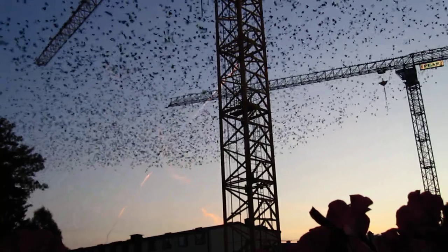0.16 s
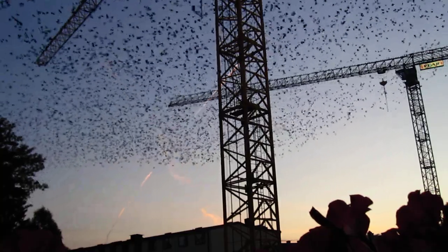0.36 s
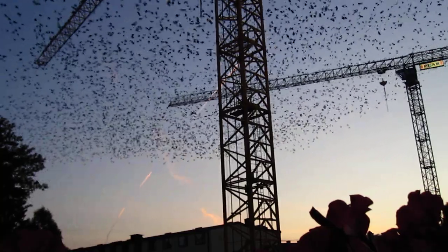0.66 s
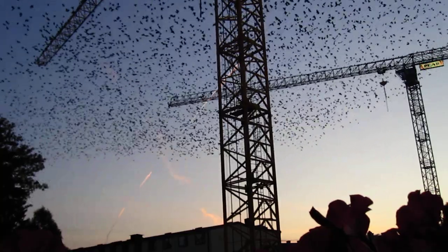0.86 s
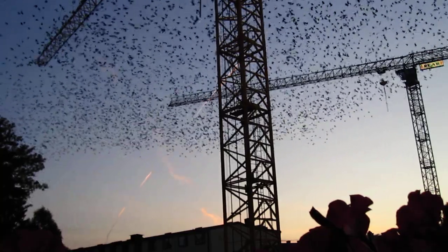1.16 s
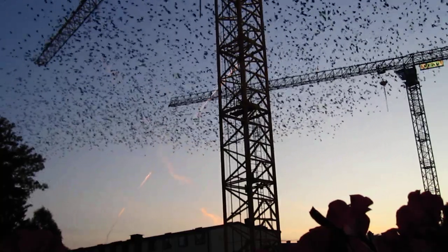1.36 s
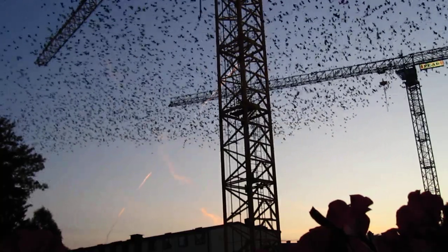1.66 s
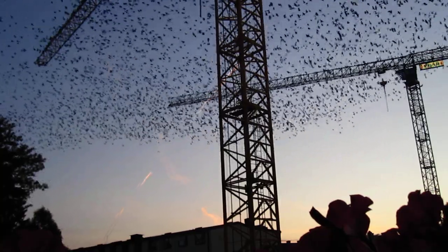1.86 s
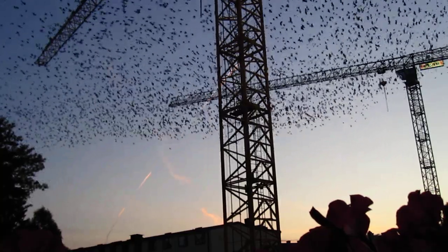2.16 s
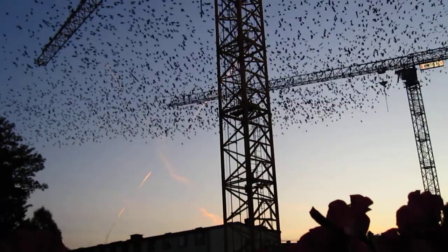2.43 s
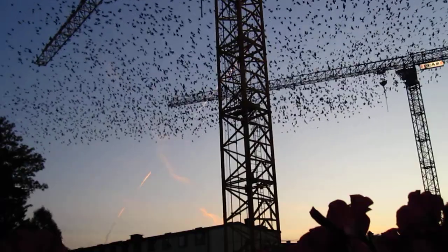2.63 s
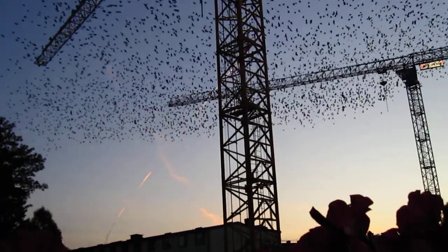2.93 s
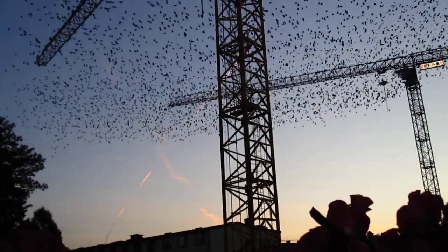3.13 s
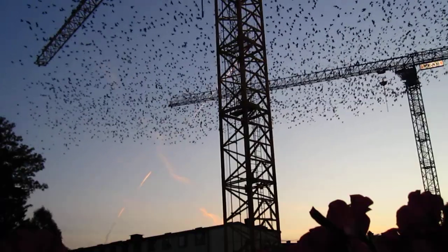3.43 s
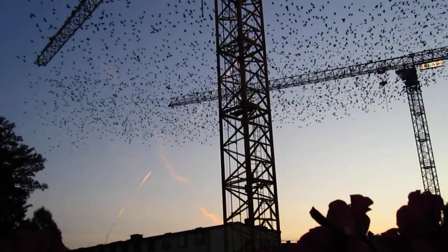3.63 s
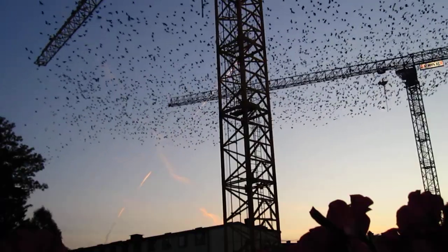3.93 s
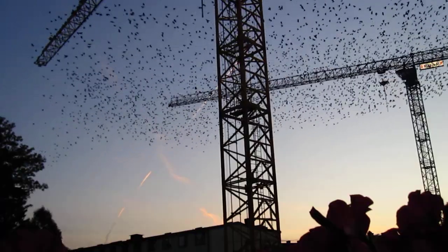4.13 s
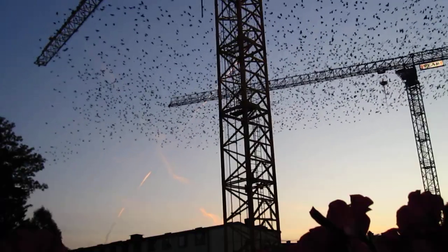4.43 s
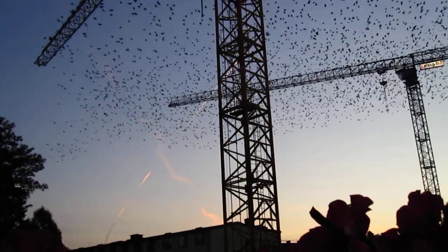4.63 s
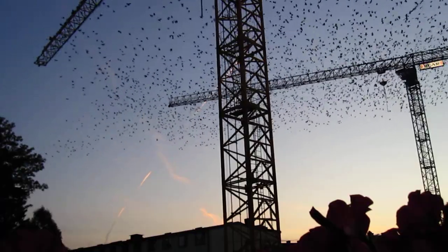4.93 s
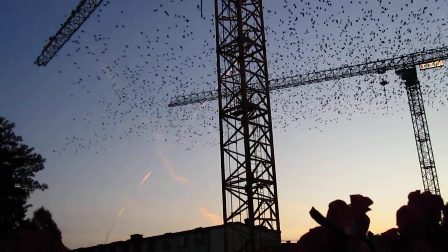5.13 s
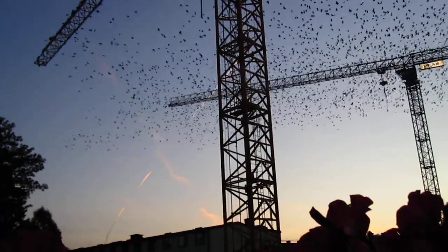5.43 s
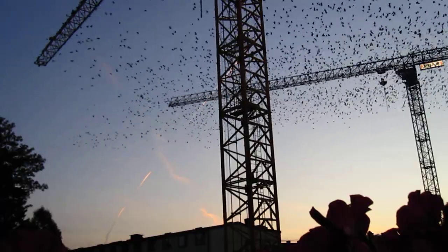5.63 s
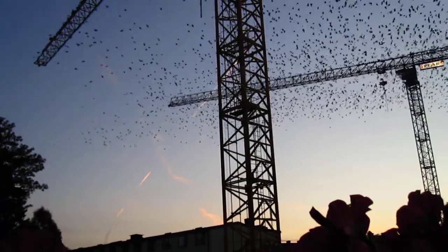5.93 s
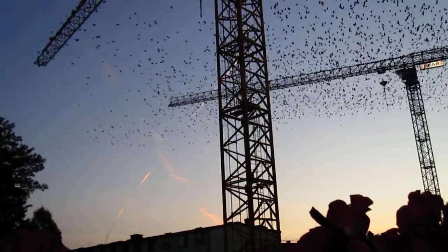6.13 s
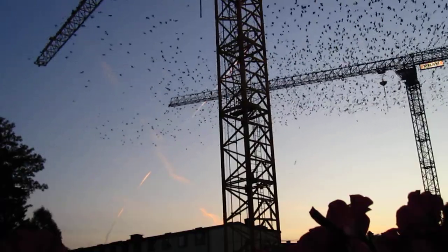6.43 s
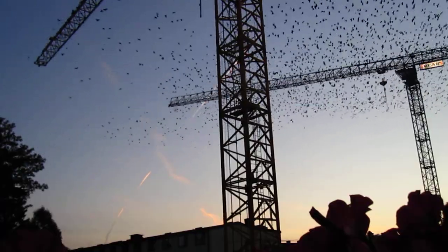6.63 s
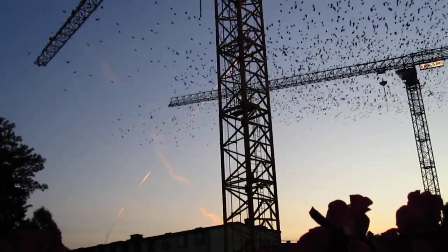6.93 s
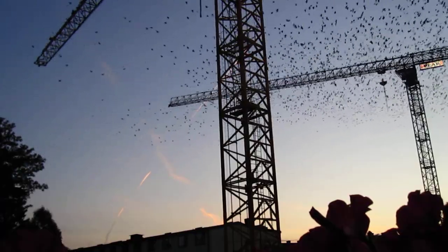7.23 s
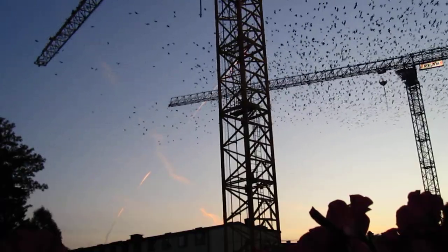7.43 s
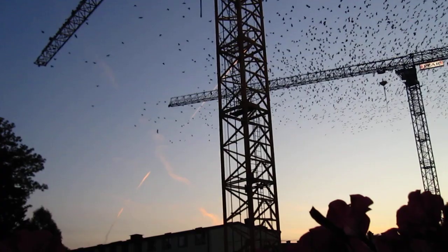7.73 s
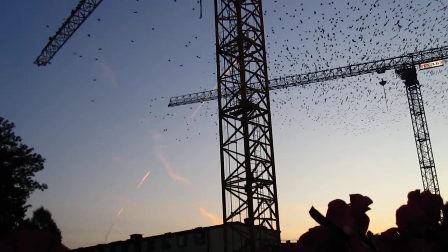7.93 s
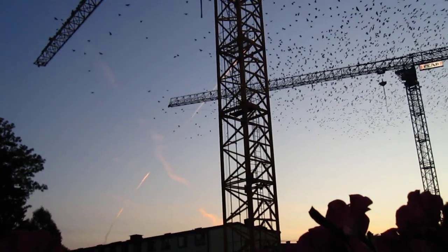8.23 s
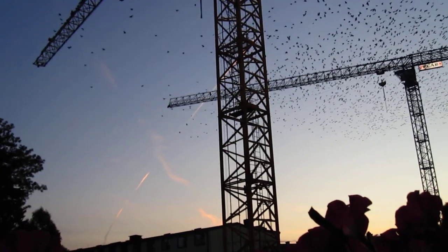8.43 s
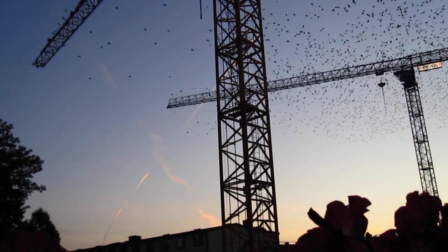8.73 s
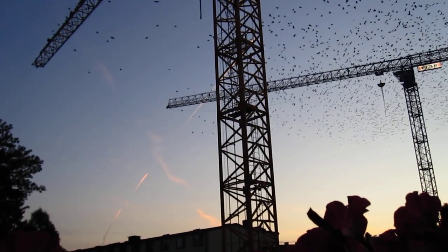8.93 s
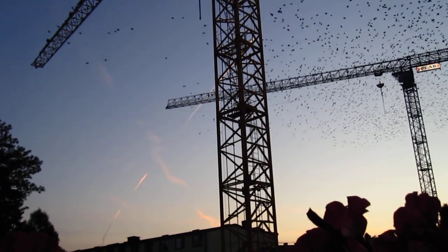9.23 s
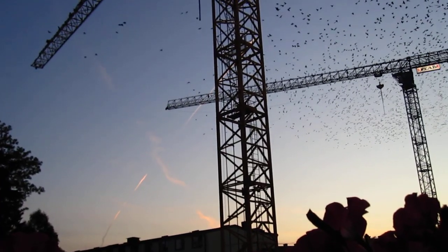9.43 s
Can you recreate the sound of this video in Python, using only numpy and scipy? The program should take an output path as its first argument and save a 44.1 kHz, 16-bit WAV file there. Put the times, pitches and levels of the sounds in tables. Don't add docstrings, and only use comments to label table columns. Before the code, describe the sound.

Outdoors at a building site, a small camera microphone picks up jackdaws overhead. Sparse sharp chacks and faint low rook caws come first over steady wing rustle and a dull traffic hum. Calls thicken after three seconds, then the whole flock breaks into a loud, overlapping chorus with raspy, falling notes. Short echoes scatter from walls, a bright wing clap snaps as the chorus begins, and the clamour continues to the end.

```python
import sys
import numpy as np
from scipy import signal
from scipy.io import wavfile

SR = 44100
rng = np.random.default_rng(int(sys.argv[2]) if len(sys.argv) > 2 else 0)


def wav_out(sig):
    wavfile.write(sys.argv[1], SR, np.round(np.clip(np.atleast_2d(sig).T, -1, 1) * 32767).astype(np.int16))


def invert_db(x):
    u = np.asarray(x, float) / 20
    return 10 ** u


N = 422037

# (time [s], start pitch [Hz], end pitch [Hz], second partial [dB], upper partials re second [dB])
LONE_CHACKS = [(0.036, 1420, 1303, -35, -14), (0.054, 1005, 773, -36, -5), (0.084, 1437, 1340, -36, -15),
               (0.295, 1340, 1194, -30, -8), (1.679, 1393, 1010, -29, -14), (1.837, 1400, 993, -30.5, -13),
               (2.231, 1434, 1028, -25, -7.5), (2.527, 1290, 1260, -28.5, -13),
               (2.693, 1300, 1100, -29, -15), (3.118, 1193, 944, -36, -16), (3.144, 1254, 1000, -32, -5.5),
               (3.267, 1287, 1200, -42, -10), (3.415, 1376, 1030, -31, -7.5), (3.59, 1210, 1054, -29, -13),
               (3.62, 1330, 1045, -36, -9), (3.678, 1353, 1148, -28.5, -13), (3.712, 1370, 1230, -26, -14),
               (3.808, 1230, 1025, -28, -9.5), (3.881, 1210, 990, -37, -14), (3.956, 1152, 1015, -36.5, -9)]
HOARSE_CHACKS = [(1.735, 1180, 1064, -36, -4.5), (1.768, 1600, 1250, -40, -2), (2.919, 1250, 1030, -25, -9),
                 (2.53, 1291, 1150, -41, -1), (0.018, 1170, 1070, -36, -8.5), (6.023, 1220, 1060, -32, -5),
                 (6.716, 1106, 923, -32, -4.5), (7.189, 1322, 1100, -32, -7), (7.642, 1230, 1177, -35, -12),
                 (8.248, 1212, 1066, -31, -13), (8.162, 1226, 1112, -32, -4.5),
                 (8.96, 1250, 1100, -36, -1.5), (9.34, 1270, 1050, -35, -1), (7.78, 1150, 906, -32, -4),
                 (5.86, 1200, 1000, -34, -0.5)]
# (time [s], start pitch [Hz], second partial [dB], upper partials re second [dB])
LEVEL_LEADERS = [(4.112, 1300, -25.5, -8), (4.39, 1160, -29, -14), (4.734, 1370, -28.5, -5),
                 (4.779, 1250, -25, -14), (4.855, 1177, -25, -4), (5.125, 1207, -21, -12),
                 (5.157, 1118, -24, -7.5), (5.69, 1085, -25, -10), (5.839, 1184, -25, -2),
                 (6.002, 1200, -25, -6.5), (6.152, 1270, -23.5, -9.5), (6.187, 1302, -30.5, -2),
                 (6.417, 1170, -27, -6.5), (6.762, 1210, -30.5, -4.5), (6.889, 1190, -30, -16),
                 (7.049, 1237, -27, -9), (7.276, 1259, -24, -9), (7.479, 1137, -27.5, -7),
                 (7.9, 1320, -26.5, -10), (7.939, 1268, -27, -5.5), (7.997, 1153, -26.5, -9),
                 (8.044, 1153, -27, -13), (8.35, 1367, -24, -14), (8.433, 1226, -29, -6),
                 (8.503, 1360, -25.5, -20), (8.792, 1096, -23.5, -12.5), (9.23, 1140, -28, -9.5),
                 (9.479, 1214, -26.5, -7.5)]
FALLING_LEADERS = [(4.085, 1272, -25, -7), (4.172, 1140, -30.5, -8), (4.287, 1250, -25.5, -10),
                   (4.606, 1286, -28, -8), (4.76, 1218, -25.5, -4), (4.89, 1287, -23.5, -3.5),
                   (5.213, 1196, -25.5, -7.5), (5.264, 1065, -29, -5), (5.455, 1420, -26, -7.5),
                   (5.509, 1384, -25.5, -7.5), (5.542, 1115, -26, -11), (5.61, 1280, -24.5, -6.5),
                   (5.745, 1263, -26, -8.5), (5.868, 1280, -23.5, -14), (5.93, 1270, -25.5, -15),
                   (5.982, 1095, -25.5, -7), (6.242, 1180, -26.5, -9), (6.39, 1230, -26.5, -19),
                   (6.45, 1524, -26.5, -16.5), (6.511, 1118, -24.5, -11), (6.815, 1160, -27, -10),
                   (7.122, 1080, -24, -11), (7.395, 1204, -24, -12.5), (7.422, 1240, -23.5, -11),
                   (7.463, 1095, -28.5, -5), (8.303, 1205, -24, -13), (8.737, 1245, -24, -10.5),
                   (9.053, 1350, -28, -5.5), (9.195, 1324, -26, -10), (9.281, 1300, -32.5, -4)]
BROKEN_LEADERS = [
    (4.326, 1313, -21, -4),
    (5.006, 1311, -20.5, -4.5),
    (5.391, 1312, -22.5, -16),
    (6.097, 1306, -21, -4.5),
    (6.855, 1328, -25, -7),
    (8.906, 1305, -24, -12),
    (6.633, 1320, -20.5, -9),
    (7.755, 1217, -22.5, -11),
    (8.115, 1296, -20, -4),
    (8.529, 1314, -27.5, -5),
]
LEVEL_SAG, FALLING_SAG, BROKEN_SAG = .05, .15, .2
BEND, BROKEN_BEND = 1.5, 2.2
SOLO_HELD_S, LEADER_HELD_S, BROKEN_HELD_S = .026, .019, .034


def near_birds():
    calls = []
    for rows, rough in [(LONE_CHACKS, .27), (HOARSE_CHACKS, .5)]:
        for s, hz, end_hz, db, upper_db in rows:
            calls.append((s, held_for(SOLO_HELD_S, db), hz, end_hz, db, upper_db, rough, BEND))
    for rows, sag in [(LEVEL_LEADERS, LEVEL_SAG), (FALLING_LEADERS, FALLING_SAG)]:
        for s, hz, db, upper_db in rows:
            held = held_for(LEADER_HELD_S, db)
            calls.append((s, held, hz, hz * (1 - sag), db, upper_db, .3, BEND))
    for s, hz, db, upper_db in BROKEN_LEADERS:
        calls.append((s, BROKEN_HELD_S, hz, hz * (1 - BROKEN_SAG), db, upper_db, .22, BROKEN_BEND))
    out = np.zeros((4, N))
    for s, held, start_hz, end_hz, db, upper_db, rough, bend in calls:
        call = chack(held, start_hz, end_hz, db, upper_db, rough, bend, rasp_db=2 + 18 * rough)
        add(out, call, s - .001)
    return throats(*out)


def held_for(usual_s, db):
    longer_s_per_db, usual_db = .0014, -25
    return np.clip(usual_s + longer_s_per_db * (usual_db - db), .01, .042)


# (frequency [Hz], level [dB])
JACKDAW_THROAT = [(700, -9), (1200, -15.5), (1700, -1.5), (2300, 0.5), (2800, -0.5), (3250, -5),
                  (5000, 0.5), (6500, -7.5), (8500, -11), (11000, -22.5), (15000, -42)]


def chack(held, start_hz, end_hz, db, upper_db, rough, bend, rasp_db):
    t = np.arange(int(.13 * SR)) / SR
    note = t[:int((held + .025) * SR)]
    after = np.maximum(note - held, 0)
    fallen = np.minimum(note / held, 1)
    pitch = start_hz + (end_hz - start_hz) * fallen ** bend
    pitch = pitch * (1 - 6.0 * after)
    levels_db = upper_db - 4.5 + 3 * rng.standard_normal((12, 1))
    levels_db[:2] = [[-1.5], [0]]
    levels_db[3] += 2.5
    top_db = 0.32 * (upper_db + 8.5) + 2 * rng.standard_normal()
    levels_db[6:] += top_db
    rough = rough * (.4 + 1.1 * fallen)
    swell = (1 - np.exp(-note / 0.0011)) * invert_db(-1100 * after - 1.9 * np.exp(-note / 0.0062))
    voiced = np.zeros(len(t))
    voiced[:len(note)] = swell * stack(pitch, levels_db, JACKDAW_THROAT, rough, count=12)
    rasp_in = np.clip((t - 0.56 * held) / 0.011, 0, 1)
    rasp_out = np.clip((held + 0.061 - t) / 0.03, 0, 1)
    breaking = rasp_in * rasp_out * invert_db(-90 * t)
    uneven = np.repeat(invert_db(rasp_db + 3 * drift(280, len(t), 8)), 8)[:len(t)]
    puffs = breaking * uneven * rng.standard_normal(len(t))
    return invert_db(db + 3.5) * np.array([voiced, puffs, puffs * invert_db(upper_db), puffs * invert_db(upper_db + top_db)])


def stack(pitch, levels_db, throat, rough, count):
    pitch = pitch * (1 + .04 * rough * drift(200, len(pitch)))
    k = np.arange(1, count + 1)[:, None]
    turns = np.cumsum(pitch) / SR
    rough_db = 6 * np.broadcast_to(rough, pitch.shape)[::8]
    flicker_db = [rough_db * drift(90, len(pitch), 8) for _ in k]
    gains = invert_db(at_hz(throat, k * pitch[::8]) + levels_db + flicker_db)
    gains = np.repeat(gains, 8, axis=1)[:, :len(pitch)]
    partials = gains * np.sin(2 * np.pi * (k * turns + rng.random((count, 1))))
    partials[2:] *= 1 + rough * np.sin(np.pi * turns)
    return partials.sum(axis=0) * (1 - rough + 1.2 * rough * drift(350, len(pitch)))


# (frequency [Hz], width [Hz], level [dB])
RASP_LOW = [(1250, 780, -7), (1660, 240, -0.5), (2343, 510, 1.5)]
RASP_UPPER = [(4030, 1800, -8), (5270, 2030, -1), (6310, 870, -5.5)]
RASP_TOP = [(8260, 1600, -8.5), (10900, 1800, -17.5)]


def throats(note, low, upper, top):
    low = signal.sosfilt(signal.butter(2, 3000, fs=SR, output="sos"), resonate(low, RASP_LOW))
    voice = note + low + resonate(upper, RASP_UPPER) + resonate(top, RASP_TOP)
    no_bass = signal.cheby2(8, 30, 700, "high", fs=SR, output="sos")
    return signal.sosfilt(no_bass, voice)


def resonate(x, modes):
    out = 0
    for k, (hz, width_hz, db) in enumerate(modes):
        r = np.exp(-np.pi * width_hz / SR)
        feed = (1 - r * r) / 2 * np.array([1, 0, -1])
        back = [1, -2 * r * np.cos(2 * np.pi * hz / SR), r * r]
        out = out + (-1) ** k * invert_db(db) * signal.lfilter(feed, back, x + 1e-18)
    return out


# (time [s], chorus level [dB], nearness as upper partials [dB])
FLOCK = [(0, -70, -9), (3.5, -55, -9), (3.6, -40, -11), (3.78, -39, -6), (4.1, -31, -14),
         (4.28, -27.5, -8.5), (4.83, -27, -11), (5.04, -23.5, -11.5), (5.48, -26.5, -11),
         (5.59, -21.5, -12), (6.15, -25, -10), (7.1, -22.5, -9), (7.45, -25.5, -10), (7.76, -22, -9.5),
         (7.92, -24.5, -10.5), (8.5, -26, -10.5), (9.34, -29.5, -9), (9.57, -25.5, -10)]
CALLS_PER_S = 55


def far_birds():
    out = np.zeros((4, N))
    level_db, upper_db = in_time(FLOCK)
    for when, high, fall, length, distance in rng.random((int(CALLS_PER_S * N / SR), 5)):
        i = int(when * N)
        start_hz = 1080 + 380 * high
        end_hz = start_hz * (.95 - .28 * fall)
        db = level_db[i] - 8.5 - 8 * (distance - .5)
        held = .018 + .02 * length
        call = chack(held, start_hz, end_hz, db, upper_db[i], rough=.35, bend=1.4, rasp_db=7)
        add(out, call, i / SR)
    return throats(*out)


# (time [s], peak level [dB])
WING_CLAPS = [
    (3.6494, -35),
    (4.2773, -20),
    (8.292, -24),
]


def wing_claps():
    out, t = np.zeros(N), np.arange(400) / SR
    for s, db in WING_CLAPS:
        add(out, invert_db(db - 2) * rng.standard_normal(400) * np.exp(-t / 0.0037), s)
    return signal.sosfilt(signal.butter(3, [7500, 14000], "band", fs=SR, output="sos"), out)


# (time [s], level [dB])
WING_LEVEL = [
    (0.0, -42.5),
    (1.31, -42.5),
    (4.69, -48),
    (5.04, -44),
    (5.44, -48.5),
    (7.54, -50),
    (7.94, -47.5),
    (8.72, -51.5),
    (9.57, -55),
]
# (frequency [Hz], density [dB per Hz])
WING_COLOUR = [(1500, 3.5), (2600, -2.5), (3600, 1), (5500, -3.5), (8000, -6), (11000, -4.5), (13000, -12),
               (15600, -32)]


def wing_rustle():
    rustle = banded_noise([(300, -40)] + WING_COLOUR, patchy_db=.4, flutter_hz=12)
    return invert_db(in_time(WING_LEVEL)[0] + 5.5) * rustle


# (time [s], length [s], start pitch [Hz], top pitch [Hz], level [dB])
CLEAR_CAWS = [
    (.55, 0.13, 380, 388, -41.5),
    (0.616, 0.22, 246.6, 255, -40.5),
    (0.803, 0.15, 311, 317, -43),
    (.88, 0.17, 386.4, 398, -42.5),
    (1.279, 0.19, 253.7, 282, -41.5),
    (1.621, 0.31, 255.7, 300, -40),
    (2.146, 0.263, 253, 262, -42),
    (2.39, .25, 384, 400.5, -41),
    (3.628, 0.27, 250, 261, -41),
]
HOARSE_CAWS = [
    (.0, 0.17, 300, 310.3, -37),
    (.17, 0.19, 298, 303.4, -41),
    (.95, 0.13, 335, 337.6, -39),
    (1.17, 0.31, 360, 368.7, -40),
    (1.9, 0.23, 283, 291, -38),
    (3.1, 0.154, 300, 309.6, -44.5),
    (3.42, 0.076, 290, 297, -41.5),
    (3.88, 0.12, 250, 251.4, -45.5),
]
# (frequency [Hz], level [dB])
ROOK_THROAT = [(700, -20), (1050, -10), (1450, 0), (1750, -4), (1980, 0), (2400, -15), (3800, -20),
               (5100, -17), (6000, -26)]


def rooks(calls, rough):
    out = np.zeros(N)
    for s, length, start_hz, top_hz, db in calls:
        u = np.linspace(0, 1, int(length * SR))
        pitch = start_hz + (top_hz - start_hz) * np.sin(2.3 * u) + 4.5 * drift(18, len(u))
        voice = rms_one(stack(pitch, 2 * rng.standard_normal((18, 1)), ROOK_THROAT, rough, count=18))
        swell = np.sin(np.pi * u) ** 0.35 * invert_db(1.5 * drift(12, len(u)))
        add(out, invert_db(db + 1.0) * swell * voice, s)
    return out


# (frequency [Hz], density [dB per Hz])
TOWN_COLOUR = [(20, -8.5), (50, -3.5), (110, -10), (220, -2.5), (450, -3.5), (800, -0.5), (1300, -1.5),
               (2000, -8), (3000, -9)]
TOWN_DB = -48


def town_traffic():
    return invert_db(TOWN_DB + 5) * banded_noise(TOWN_COLOUR + [(5000, -46)], patchy_db=1.0, flutter_hz=2.084)


def banded_noise(spectrum, patchy_db, flutter_hz):
    out, edges, white = 0, 22 * 2 ** np.arange(0, 9.6, .5), rng.standard_normal((2, N))
    together = drift(flutter_hz, N, 32)
    for k, (low, high) in enumerate(zip(edges, edges[1:])):
        band = signal.sosfilt(signal.butter(2, [low, high], "band", fs=SR, output="sos"), white[k % 2])
        flicker_db = patchy_db * (together + drift(flutter_hz, N, 32))
        gain = invert_db(at_hz(spectrum, np.sqrt(low * high)) + flicker_db)
        out = out + band * np.repeat(gain, 32)[:N]
    return rms_one(out)


def site(x, early_db, late_db):
    out, hop, t = np.zeros(N), SR // 4, np.arange(SR // 2) / SR
    padded, fade = np.pad(x, (0, 2 * hop)), np.hanning(2 * hop + 1)[:-1]
    for i in range(0, N, hop):
        early = rng.standard_normal(len(t)) * np.clip((t - .012) / .015, 0, 1) * invert_db(-60 * t / .15)
        late = rng.standard_normal(len(t)) * np.clip((t - .04) / .05, 0, 1) * invert_db(-60 * t / .5)
        late = signal.lfilter([.4], [1, -.6], late)
        reply = (invert_db(early_db) * rms_one(early) + invert_db(late_db) * rms_one(late)) / np.sqrt(len(t))
        reply[rng.integers(200, 450)] += invert_db(-12.5)
        add(out, signal.fftconvolve(padded[i:i + 2 * hop] * fade, reply), i / SR)
    return x + out


def rms_one(x):
    return x / np.sqrt(np.mean(x ** 2) + 1e-20)


def in_time(rows):
    s, *columns = np.transpose(rows)
    return [np.interp(np.arange(N) / SR, s, c) for c in columns]


def at_hz(points, hz):
    point_hz, db = np.transpose(points)
    return np.interp(np.log(hz), np.log(point_hz), db)


def drift(rate_hz, count, step=1):
    points = rng.standard_normal(int(count * 400 / SR) + 3)
    return np.interp(np.arange(0, count, step) * rate_hz / SR, np.arange(len(points)), points)


def add(track, sound, s):
    i = int(s * SR)
    track[..., i:i + sound.shape[-1]] += sound[..., :max(N - i, 0)]


def scene():
    clear_rooks, hoarse_rooks = rooks(CLEAR_CAWS, rough=.17), rooks(HOARSE_CAWS, rough=.45)
    near = site(near_birds() + wing_claps() + clear_rooks, early_db=-8.5, late_db=-14.5)
    far = site(far_birds() + hoarse_rooks, early_db=-3, late_db=-7)
    return (near + far + wing_rustle() + town_traffic())[None]


def roll_off(x):
    return signal.sosfilt(signal.butter(12, 15720, fs=SR, output="sos"), x)


def record(dry):
    heard = signal.sosfilt(signal.butter(4, 14200, fs=SR, output="sos"), dry)
    heard = signal.sosfilt(signal.cheby2(8, 40, 16000, fs=SR, output="sos"), heard)
    return roll_off(heard)


dry = scene()
out = record(dry)
wav_out(out)
```